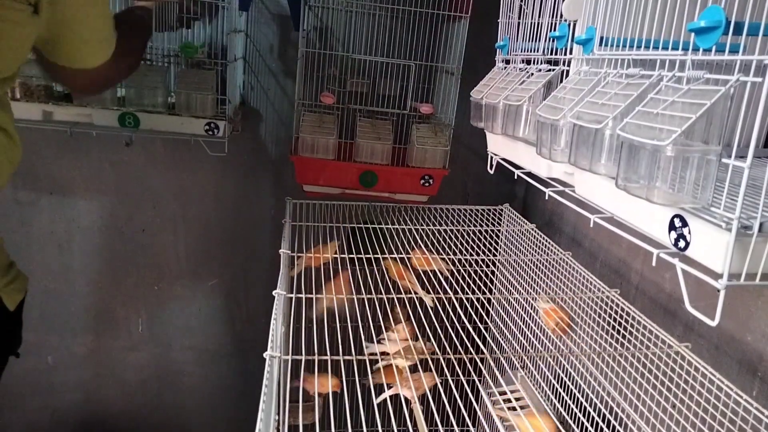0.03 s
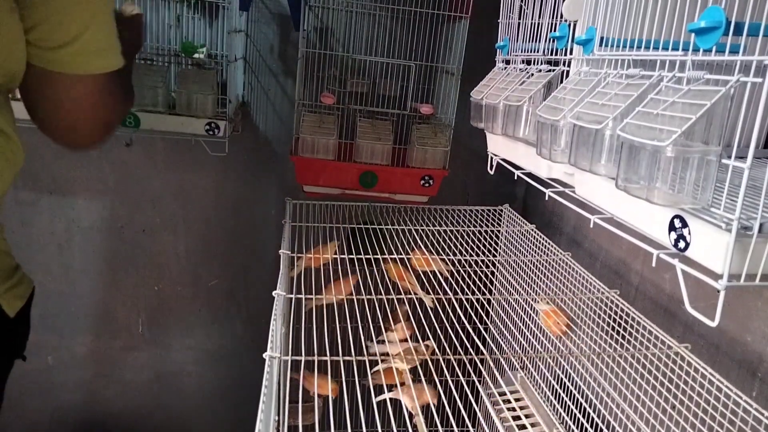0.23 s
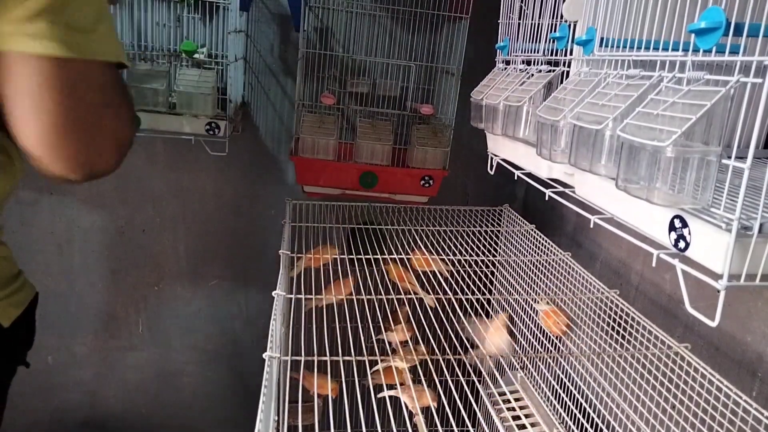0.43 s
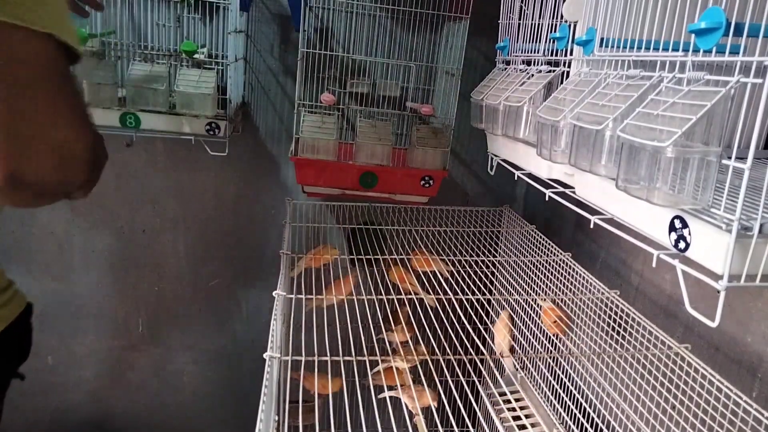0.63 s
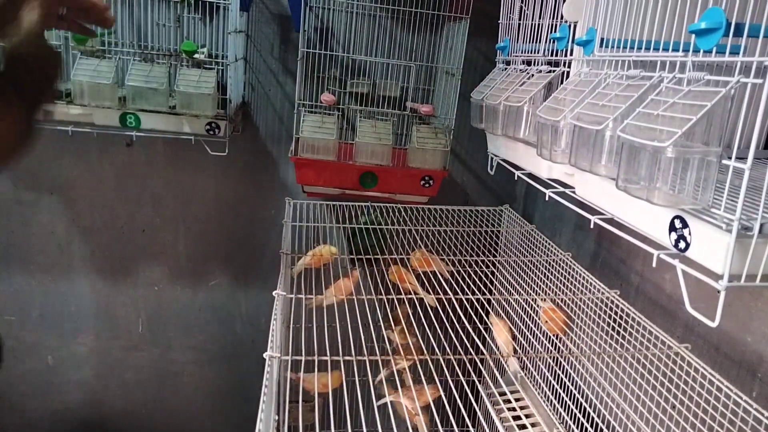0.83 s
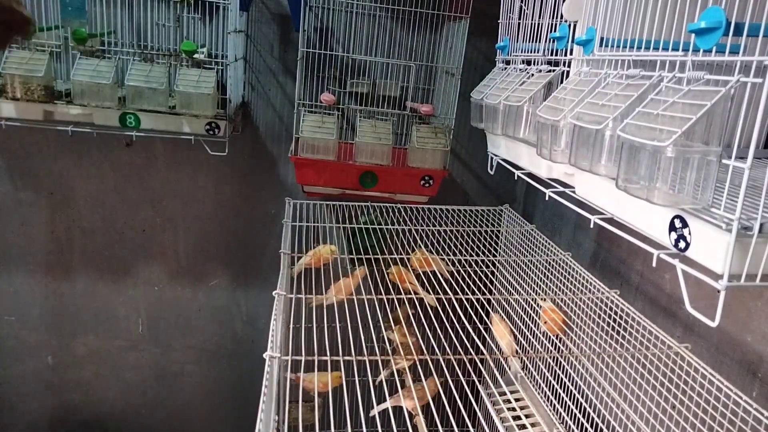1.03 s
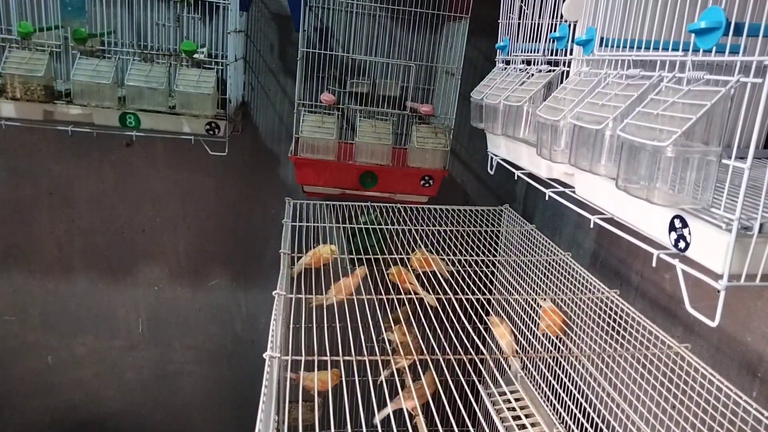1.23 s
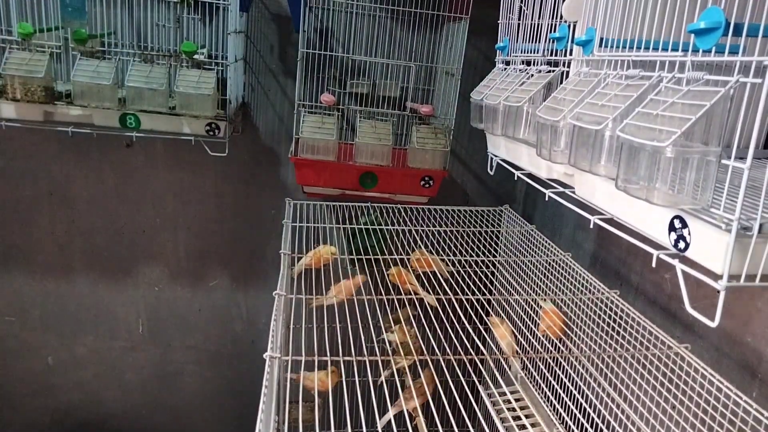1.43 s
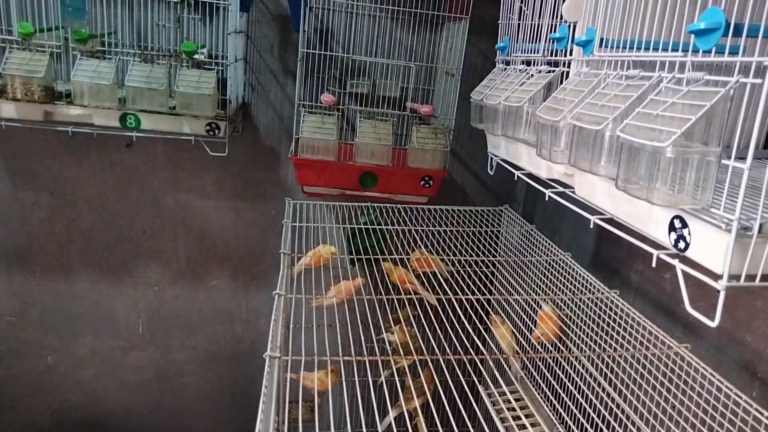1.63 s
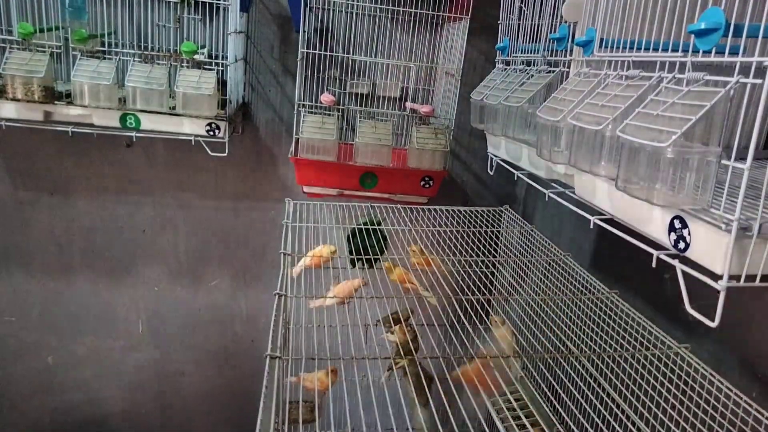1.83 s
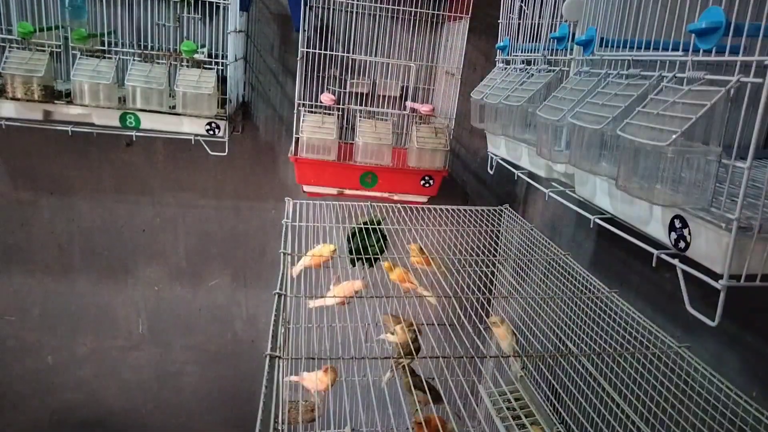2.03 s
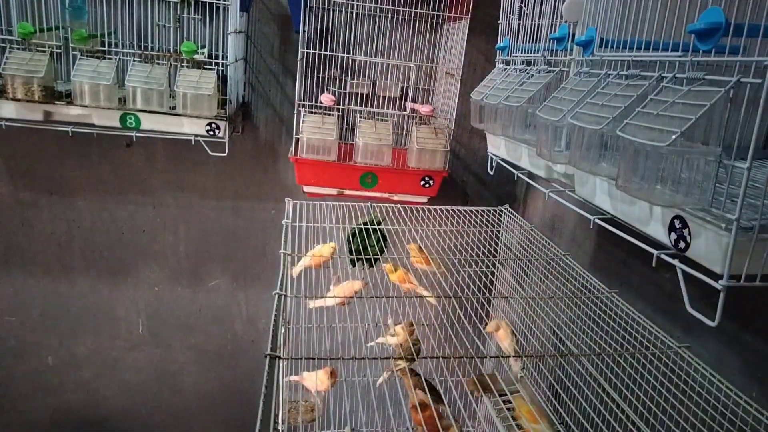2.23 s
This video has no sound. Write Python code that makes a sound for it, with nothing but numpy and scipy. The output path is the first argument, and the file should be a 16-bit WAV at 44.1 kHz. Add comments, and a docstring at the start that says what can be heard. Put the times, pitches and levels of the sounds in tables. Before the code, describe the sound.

Canary calls in a small, slightly echoing room with quiet hiss and low rumble. Feet tick on cage wires and dull hollow knocks sound until about 0.7 s. From 0.73 to 1.04 s a hoarse chirp rises and clears into a whistle. Feathers rustle; three quick wing beats puff near 1.5 s. A level, buzzy two-toned chirp lasts 1.61-1.85 s, then a faint bump at 1.9 s and fading rustles.

```python
"""Canaries in a flight cage in a small room. Shaped noise gives hiss, rumble and rustling plumage throughout;
faint frequency-modulated whistles sound far off, feet tick on the wires and a struck resonator knocks.
A hoarse call of summed harmonics then rises and clears into a whistle; three wing beats push the air.
A level call follows, sung with both sides of the syrinx, each a rough harmonic source, and a sum tone;
a soft bump of dull noise comes near its end. Reflections and a diffuse tail surround the calls."""
import sys
import numpy as np
from scipy import signal
from scipy.fft import rfft, irfft
from scipy.io import wavfile

SR = 44100
rng = np.random.default_rng(int(sys.argv[2]) if len(sys.argv) > 2 else 0)


def digitize_waveform(pressure):
    """Quantize a signal to 16-bit integers and store it at the path in sys.argv[1].

    Rows of a 2-D input are taken as channels; values are limited to [-1, 1].
    """
    field = np.atleast_2d(pressure).T
    bounded = np.clip(field, -1, 1)
    quanta = np.round(bounded * 32767).astype(np.int16)
    wavfile.write(sys.argv[1], SR, quanta)


N = 101165


def undb(db):
    """Logarithmic level: decibels to amplitude gain."""
    return 10 ** (np.asarray(db) / 20)


def clock():
    """Uniform sampling: the time of every sample in seconds."""
    return np.arange(N) / SR


def track(points):
    """Linear interpolation of (t/s, value) points at every sample."""
    return np.interp(clock(), *np.array(points).T)


def noise(gain):
    """Spectral shaping: white noise weighted by gain(f/Hz), then scaled to rms 1."""
    hz = np.arange(N // 2 + 1) * SR / N + 1  # the 1 Hz offset avoids log(0)
    y = irfft(rfft(rng.standard_normal(N)) * gain(hz), N)
    return y / y.std()


def coloured(points):
    """Spectral density: rms-1 noise with (f/Hz, density/dB) points, falling away under the first."""
    hz, db = np.array(points, float).T

    def gain(f):
        return undb(np.interp(np.log(f), np.log(hz), db)) * np.minimum(f / hz[0], 1) ** 2

    return noise(gain)


def wander(hz):
    """Low-pass random modulation: rms-1 motion, mostly slower than the given rate."""
    return noise(lambda f: 1 / (1 + (f / hz) ** 2))


def swell(at, half):
    """Gaussian envelope: smooth rise and fall around a moment."""
    return np.exp(-((clock() - at) / half) ** 2)


def burst(start, rise, decay):
    """Damped transient: quick linear rise, exponential decay."""
    age = np.maximum(clock() - start, 0)
    return np.minimum(age / rise, 1) * np.exp(-np.maximum(age - rise, 0) / decay)


# spectrum of the hiss: f/Hz, relative density/dB
HISS_SPECTRUM = [(130, -5), (220, -9.5), (400, -9), (800, -11.5), (1500, -17), (3000, -20), (5500, -23),
                 (8500, -11), (11000, -20), (15500, -13)]
# course of the hiss: t/s, level/dB
HISS_LEVEL = [(0, -56), (.18, -60.5), (.24, -62), (.32, -60), (.6, -61), (1.15, -60.5), (1.9, -61),
              (2.1, -61), (2.16, -65), (2.29, -65.5)]
# spectrum of the rumble: f/Hz, relative density/dB
RUMBLE_SPECTRUM = [(12, -14.5), (28, -2), (42, -0.5), (52, -10), (80, -6), (110, -30), (150, -17),
                   (220, -31.5), (500, -45)]
# course of the rumble: t/s, level/dB
RUMBLE_LEVEL = [(0, -59), (2.29, -61.5)]


def background():
    """Stationary noise with slow level modulation: wavering hiss and low rumble of the room."""
    hiss = coloured(HISS_SPECTRUM) * undb(track(HISS_LEVEL) + 1.85 * wander(34))
    rumble = coloured(RUMBLE_SPECTRUM) * undb(track(RUMBLE_LEVEL))
    return hiss + rumble


# faint whistles of other birds: start t/s, end t/s, f/Hz, level/dB
FAR_WHISTLES = [(-.2, 0.304, 1340, -70), (0.967, 0.976, 3160, -58), (1.003, 1.007, 3995, -54)]


def far_birds():
    """Frequency and amplitude modulation: faint wavering whistles from other cages."""
    flutter = undb(3.8 * wander(31))
    wavering_time = np.cumsum(1 + 0.033 * wander(88)) / SR
    y = np.zeros(N)
    for start, end, hz, db in FAR_WHISTLES:
        envelope = swell((start + end) / 2, (end - start) / 2)
        y += undb(db) * envelope * np.sin(2 * np.pi * hz * wavering_time)
    return np.sqrt(2) * flutter * y


# spectrum of rubbing feathers: f/Hz, relative density/dB
FEATHER_SPECTRUM = [(1500, -5.5), (3000, -10), (5500, -6.5), (7000, -0.5), (8400, 6), (10000, -1),
                    (12500, -3), (15500, 4)]


def feather_hiss():
    """Friction noise: many small contacts give a hiss with a grainy, fluctuating level."""
    return coloured(FEATHER_SPECTRUM) * undb(2.2 * wander(370))


# duller part of the rustle: f/Hz, relative density/dB
BODY_SPECTRUM = [(100, -21), (250, -3), (700, -1), (1400, -1), (2600, -1.5), (4000, -4), (8000, -11.5)]
# swells of rustling: peak t/s, rise/s, fall/s, level/dB, body level/dB (re 10 dB below the hiss)
RUSTLE_EVENTS = [(.03, 0.12, 0.023, -61.5, 2), (0.42, 0.0095, 0.019, -56.5, -6),
                 (0.673, 0.015, 0.032, -62, 11), (0.971, 0.018, 0.061, -47.5, 7),
                 (1.027, 0.0054, 0.023, -54, -29), (1.287, 0.056, 0.062, -51, 3.5),
                 (1.41, 0.023, 0.034, -54.5, -3), (1.56, 0.094, 0.22, -57, 0.5),
                 (1.744, 0.021, 0.062, -54.5, 3.5), (1.821, 0.041, 0.043, -49.5, 1.5),
                 (1.91, 0.035, 0.027, -60, 0.5), (1.995, .025, 0.051, -50, -2.5),
                 (2.057, 0.024, 0.053, -58, 6), (2.283, 0.027, .03, -54.5, 0.5)]


def rustles():
    """Friction noise under asymmetric Gaussian envelopes: swells of rustling feathers."""
    t, y = clock(), np.zeros(N)
    hiss, body = feather_hiss(), coloured(BODY_SPECTRUM)
    for at, rise, fall, db, body_db in RUSTLE_EVENTS:
        envelope = swell(at, np.where(t < at, rise, fall))
        y += undb(db) * envelope * (hiss + undb(body_db - 10) * body)
    return y


# spectrum of a scratch on wire: f/Hz, relative density/dB
WIRE_SPECTRUM = [(1000, -3.5), (4000, -15), (7000, -7), (8400, 7), (10000, -6.5), (15500, -5.5)]
# feet on the wires: t/s, level/dB, decay/s
FOOT_TICKS = [(.022, -48.5, 0.0058), (0.056, -52, 0.03), (0.149, -53, 0.0068), (0.322, -53.5, 0.0094),
              (0.447, -50.5, 0.03), (0.705, -48, 0.021)]


def ticks():
    """Impulsive excitation: feet scratch the wires in bright decaying bursts."""
    envelope = sum(undb(db) * burst(at, 0.0016, decay) for at, db, decay in FOOT_TICKS)
    return coloured(WIRE_SPECTRUM) * envelope


# resonances of the hollow object: f/Hz, bandwidth/Hz, relative level/dB
HOLLOW_MODES = [(932, 72, 10), (1470, 64, -16), (1960, 76, -19), (2870, 190, -17.5)]
# hollow knocks: t/s, level/dB
KNOCK_EVENTS = [(0.268, -61), (0.322, -54), (0.339, -56), (.38, -63.5), (0.402, -55), (0.488, -61.5),
                (0.556, -64.5), (.595, -69), (0.658, -55), (0.724, -65)]
KNOCK_RISE_S, KNOCK_DECAY_S = 0.0039, 0.047


def knocks():
    """Modal resonance: noise shaped by resonance curves decays after each dull, hollow knock."""
    def resonances(f):
        return sum(undb(db) / np.hypot(1, (f * f - hz * hz) / (f * width)) for hz, width, db in HOLLOW_MODES)

    envelope = sum(undb(db) * burst(at, KNOCK_RISE_S, KNOCK_DECAY_S) for at, db in KNOCK_EVENTS)
    return noise(resonances) * envelope


# colour of throat and beak: f/Hz, gain/dB
THROAT_GAIN = [(1400, 3.5), (2100, 0.5), (2700, -1.5), (3600, -1), (5200, 2.5), (6500, 2.5), (7600, -0.5),
               (9500, -7), (12500, 1), (15000, 7.5)]
ATTACK_S, RELEASE_S = 0.0082, 0.0034  # a membrane starts and stops
JITTER, JITTER_HZ, SHIMMER = 0.0118, 301, 0.35  # jitter and shimmer are shares at full roughness
RASP_HZ = 490  # rate of the unevenness of single cycles
RASP_FROM_HZ, RASP_FULL_HZ = 3540, 7000  # it frays the overtones more and more between these


def syrinx(table, partials_db, air, air_db, fray, order):
    """Source-filter principle: an unsteady membrane's harmonics and rushing air, coloured by the throat.

    Overtones above order follow the brightness column; fray is the phase unevenness in radians.
    Returns sound, phase and strength.
    """
    t, cols = clock(), np.array(table, float).T
    hz, db, bright, rough = (np.interp(t, cols[0], c) for c in cols[1:5])
    rough = np.clip(rough, 0, 1)
    attack = np.clip((t - cols[0, 0]) / ATTACK_S, 0, 1)
    release = np.clip((cols[0, -1] - t) / RELEASE_S, 0, 1)
    gain = undb(db) * attack * release
    phase = 2 * np.pi * np.cumsum(hz * (1 + JITTER * rough * wander(JITTER_HZ))) / SR
    y = undb(air_db + bright) * rough * coloured(air)
    shimmer = 1 + SHIMMER * rough * wander(280)
    rasp = fray * rough * noise(lambda f: 1 / (1 + (f / RASP_HZ) ** 4))
    for k, part_db in enumerate(partials_db, 1):
        throat_db = np.interp(k * hz, *np.array(THROAT_GAIN).T)
        fraying = (k * hz / RASP_FROM_HZ) ** 2 / (1 + (k * hz / RASP_FULL_HZ) ** 2)
        wave = np.sin(k * phase + (k > 1) * rasp * fraying)  # the fundamental is spared
        audible = k * hz < SR / 2  # no aliasing
        y = y + np.sqrt(2) * undb(part_db + throat_db + bright * (k > order)) * wave * audible
    return gain * shimmer * y, phase, gain


# rising call: t/s, pitch f/Hz, level/dB, upper overtones and air level/dB, roughness (clipped to 0-1)
RISING_TRACK = [(.727, 1385, -72, 11, .8), (.745, 1421, -50.5, 3.5, 1.2), (.755, 1570, -46.5, 0.5, 1.1),
                (.773, 1782, -50, 4, 0.94), (.798, 1833, -45, 0.5, 0.87), (.814, 1935, -49.5, -5, 0.7),
                (.826, 2035, -39.5, -2, .33), (.845, 2188, -42.5, -4.5, 0.23), (.872, 2330, -52, -2, 0.5),
                (.9, 2458, -45.5, -10.5, 0.12), (.925, 2515, -42.5, -11, 0.13), (.95, 2583, -48, -24, .05),
                (.973, 2627, -38.5, -17, 0), (1.004, 2748, -47.5, -6.5, 0.01), (1.038, 2740, -52, -15, .12)]
# its harmonics, from the first up: relative level/dB
RISING_HARMONICS = [-8, 0, -1, -1, -3.5, -8.5, -11, -12, -8, -19]
# its rushing air: f/Hz, relative density/dB
RISING_AIR = [(800, -19), (2500, -25), (4000, -14), (6500, -13), (8500, -14), (11000, -21), (15500, -46)]


def rising_call():
    """Harmonic source with falling roughness: a hoarse upward glide clears into a whistle."""
    return syrinx(RISING_TRACK, RISING_HARMONICS, RISING_AIR, air_db=-5, fray=.45, order=2)[0]


# spectrum of the puffs: f/Hz, relative density/dB
PUFF_SPECTRUM = [(6500, -3), (8300, 2.5), (10000, -2), (12800, -6), (15500, -15)]
# air forced out as each call starts: t/s, half length/s, level/dB
PUFF_EVENTS = [(0.742, 0.015, -49), (1.643, 0.022, -42)]


def onset_puffs():
    """Turbulent flow: a brief swell of air noise as each call starts."""
    envelope = sum(undb(db) * swell(at, half) for at, half, db in PUFF_EVENTS)
    return coloured(PUFF_SPECTRUM) * envelope


# near reflections from floor and walls: delay t/s, level/dB
REFLECTIONS = [(.0031, -24), (.0074, -10.5), (.0135, -11), (.023, -19)]
# colour of the diffuse tail: f/Hz, relative density/dB
TAIL_SPECTRUM = [(2800, -4), (5400, -3.5), (15000, -11.5)]
ROOM_T60_S, ROOM_DB, ROOM_GAP_S = .22, -11.5, .004


def room(x):
    """Reverberation: a few near reflections, then convolution with exponentially decaying noise."""
    t = clock()
    tail = coloured(TAIL_SPECTRUM) * np.exp(-np.log(1000) * t / ROOM_T60_S) * (t > ROOM_GAP_S)
    tail /= np.linalg.norm(tail)  # unit energy
    near = sum(undb(db) * np.pad(x, (int(lag * SR), 0))[:N] for lag, db in REFLECTIONS)
    return x + near + undb(ROOM_DB) * signal.fftconvolve(x, tail)[:N]


# wing beats: t/s, swish level/dB, gain of the push of air/dB
BEAT_EVENTS = [(1.476, -49, -39), (1.529, -51, -38.5), (1.578, -51.5, -39.5)]
SWISH_S, PUSH_S, REFILL_S = 0.0096, 0.006, 0.04


def wing_beats():
    """Displacement flow: each beat swishes and pushes air at the microphone as a balanced pressure pulse."""
    y, hiss = np.zeros(N), feather_hiss()
    for at, db, push_db in BEAT_EVENTS:
        push = swell(at, REFILL_S) * PUSH_S / REFILL_S - swell(at, PUSH_S)  # zero net area
        y += undb(db) * burst(at, 0.001, SWISH_S) * hiss + undb(push_db) * push
    return y


# The three tracks below: t/s, pitch f/Hz, level/dB, upper overtones and air level/dB, roughness (0-1)
# lower side of the syrinx, opening slide that beats against the upper side
SLIDE_TRACK = [(1.612, 2688, -68, -10, 0.27), (1.619, 2746, -50.5, -22, .3), (1.631, 3130, -49.5, -26, .6),
               (1.664, 3430, -45, -18, 0.6), (1.677, 3460, -62, -14, .3)]
# upper side
UPPER_TRACK = [(1.616, 2816, -70, -6, 0.24), (1.628, 3335, -50, -8, 0.25), (1.645, 3526, -48.5, 2, 0.2),
               (1.675, 3610, -53, 6.5, 0.28), (1.685, 3769, -45, 15.5, 0.02),
               (1.696, 3717, -53, 11.5, 0.65), (1.725, 3730, -46, 1, 0.56), (1.763, 3666, -49.5, 1.5, 0.7),
               (1.779, 3674, -55.5, 3, 0.2), (1.796, 3522, -42.5, -12, 0.44), (1.807, 3570, -56, -5, 0.4),
               (1.827, 3526, -56, -10, 0.3), (1.834, 3500, -82, -14, .3)]
# lower side, closing note
LOWER_TRACK = [(1.71, 2200, -69, 7, .6), (1.757, 2480, -68.5, 13.5, 0.47), (1.776, 2680, -59, -14, .5),
               (1.8, 2809, -45, -4.5, 0.33), (1.822, 2767, -44.5, -4.5, 0.18), (1.83, 2476, -61, 14, .45),
               (1.838, 2122, -47, -3, 0.27), (1.854, 1940, -61, 5, .25)]
# harmonics of the upper side, from the first up: relative level/dB
UPPER_HARMONICS = [2, -1, -16.5, -33]
# harmonics of the lower side, from the first up: relative level/dB
LOWER_HARMONICS = [-1, 0, -8, -17]
# rushing air of the level call: f/Hz, relative density/dB
LEVEL_AIR_SPECTRUM = [(2500, -19), (4200, -6.5), (5700, -14), (7200, -2), (8500, -12), (11000, -17)]
# lines at 0.5, 1.5 and 2.5 times the upper pitch: relative level/dB
HALF_LINES = [-6.5, -5, -35]
# course of these half-pitch lines: t/s, gain/dB
HALF_LEVEL = [(1.63, -4.5), (1.696, -6), (1.725, -23)]
SUM_TONE_DB = 2.5


def level_side(table, partials_db):
    """Source-filter principle: one side of the syrinx in the level call, with its air and rasp."""
    return syrinx(table, partials_db, LEVEL_AIR_SPECTRUM, air_db=-4, fray=1.1, order=1)


def two_voiced_call():
    """Beating, period doubling and a sum tone: both sides start close and buzz; later the lower returns."""
    slide = level_side(SLIDE_TRACK, LOWER_HARMONICS)[0]
    upper, upper_phase, upper_gain = level_side(UPPER_TRACK, UPPER_HARMONICS)
    lower, lower_phase, lower_gain = level_side(LOWER_TRACK, LOWER_HARMONICS)
    cols = np.array(UPPER_TRACK).T
    bright = np.interp(clock(), cols[0], cols[3])
    half_db = track(HALF_LEVEL)
    slip = .5 * wander(210)  # phase wander in radians
    halves = np.zeros(N)
    for k, db in enumerate(HALF_LINES):
        halves += undb(db + half_db + bright * (k > 0)) * np.sin((k + .5) * upper_phase + slip)
    sum_tone = undb(SUM_TONE_DB) * np.sqrt(upper_gain * lower_gain) * np.sin(upper_phase + lower_phase)
    return upper + lower + slide + np.sqrt(2) * upper_gain * halves + sum_tone


# soft dull bump: t/s, half length/s, level/dB
BUMP_EVENT = (1.9, 0.042, -63.5)
# its spectrum: f/Hz, relative density/dB
BUMP_SPECTRUM = [(110, 0), (420, -7), (900, -16), (2500, -30)]


def bump():
    """Low-frequency noise under a Gaussian envelope: one soft bump."""
    at, half, db = BUMP_EVENT
    return undb(db) * swell(at, half) * coloured(BUMP_SPECTRUM)


def scene():
    """Superposition: both calls in the room, with the small noises of the cages."""
    calls = room(rising_call() + onset_puffs() + two_voiced_call())
    plumage = rustles() + wing_beats()
    cage = ticks() + knocks() + bump()
    return (background() + far_birds() + plumage + cage + calls)[None]


def record(dry):
    """Band limiting: the recorder's steep elliptic low-pass cuts the top."""
    top_hz = 15750
    return signal.sosfilt(signal.ellip(10, .2, 70, top_hz, fs=SR, output="sos"), dry)


dry = scene()
out = record(dry)
digitize_waveform(out)
```